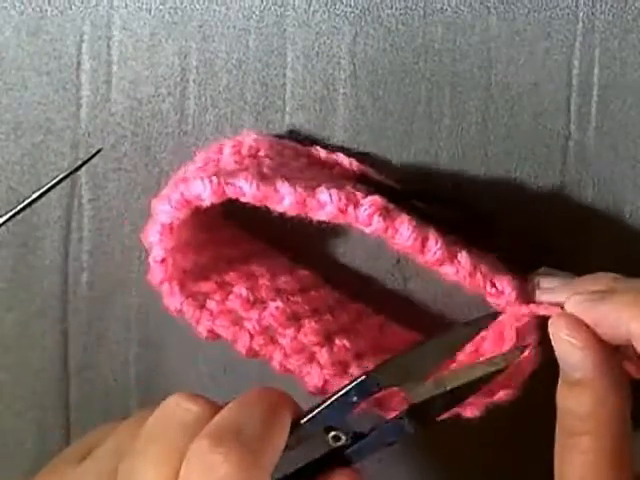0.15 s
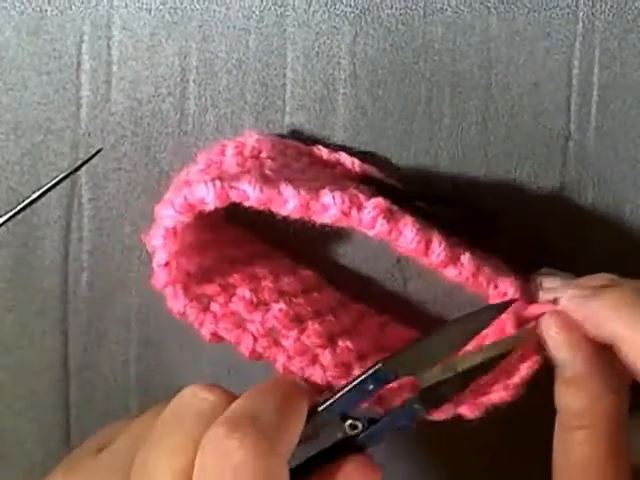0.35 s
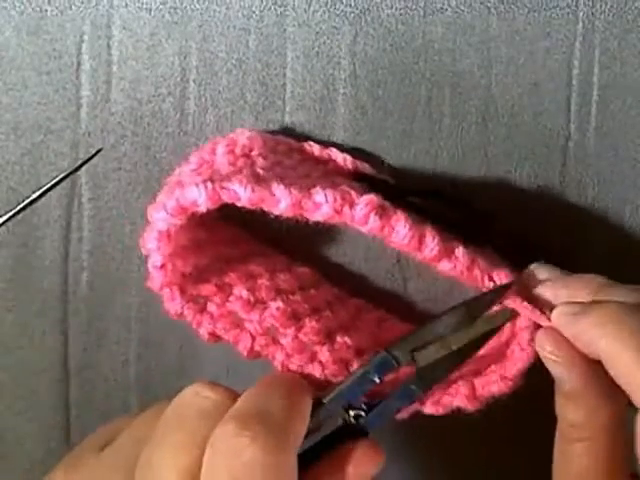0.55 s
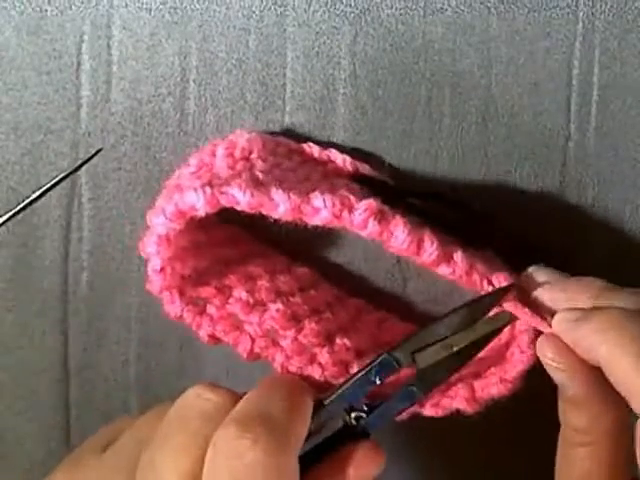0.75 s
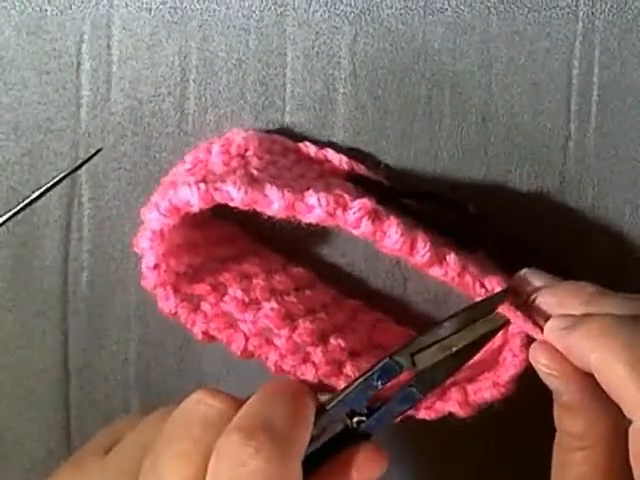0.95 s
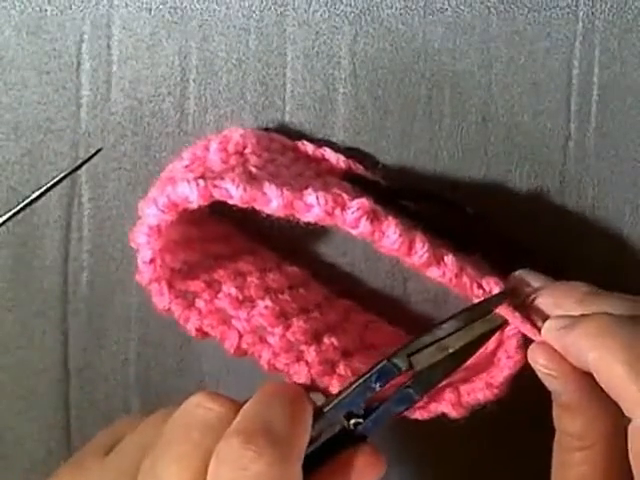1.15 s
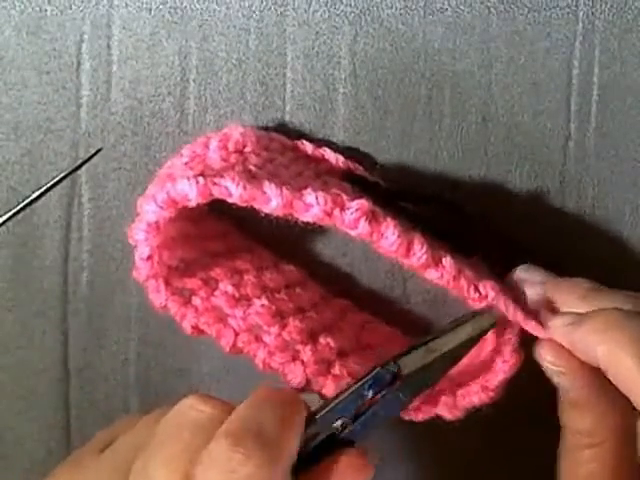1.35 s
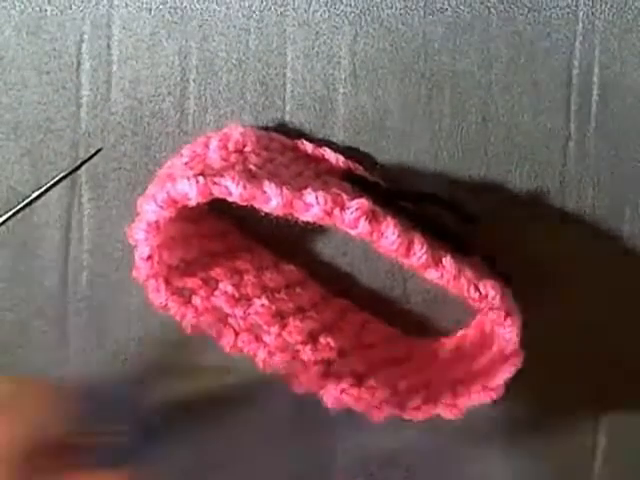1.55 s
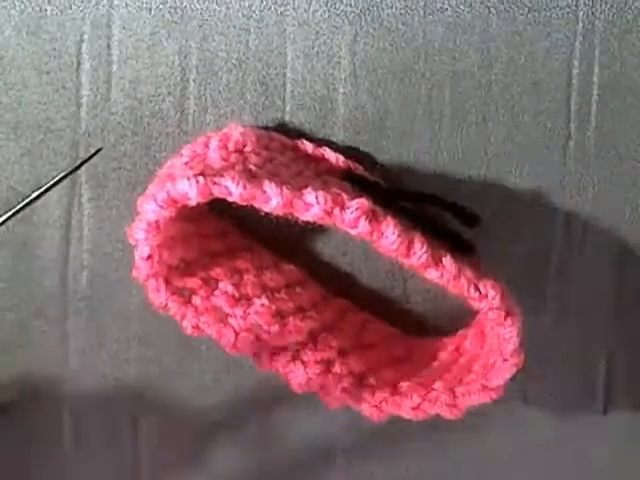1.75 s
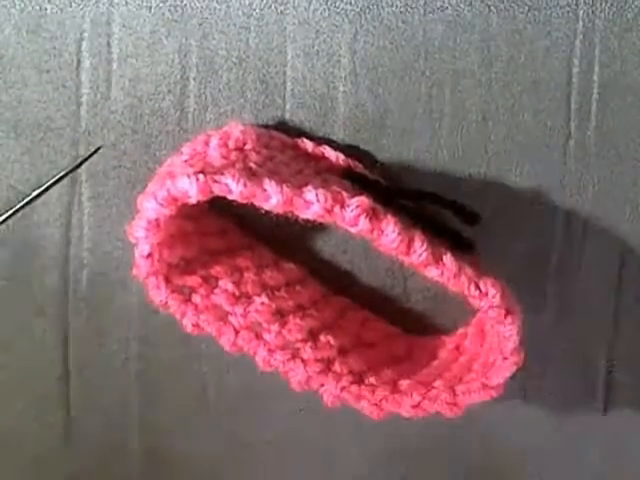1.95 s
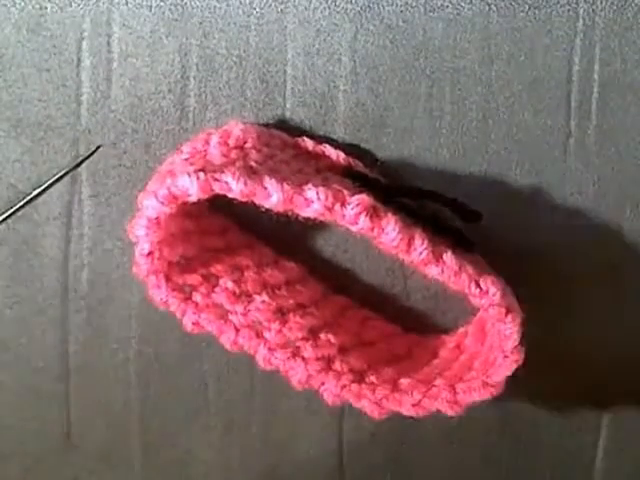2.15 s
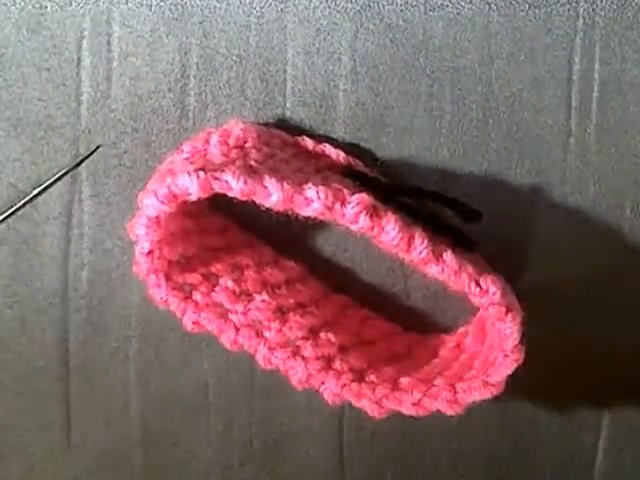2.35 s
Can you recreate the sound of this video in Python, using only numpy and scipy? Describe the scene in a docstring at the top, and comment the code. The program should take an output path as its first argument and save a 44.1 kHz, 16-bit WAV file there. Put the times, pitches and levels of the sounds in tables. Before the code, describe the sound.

Small scissors snip once through yarn, followed by a fainter click, in a quiet room.

```python
"""A quiet room with a bed of air and mains hum; hands bump softly on a cloth-covered table throughout. At about
1.3 s small steel scissors slide closed on a strand of yarn, close to the microphone. At 1.4 s the edges crunch
through the fibres, the blades clap shut and ring, and the handles knock, with a short room tail. At 1.6 s the
blades scrape briefly and knock as they part, and from about 1.9 s a faint thin hiss comes up."""
import sys
import numpy as np
from scipy import signal
from scipy.fft import rfft, irfft
from scipy.io import wavfile
from scipy.ndimage import uniform_filter1d, map_coordinates

SR = 44100
rng = np.random.default_rng(int(sys.argv[2]) if len(sys.argv) > 2 else 0)


def store_wav(level_fs):
    """Save 16-bit WAV to argv[1]."""
    pcm = np.round(np.clip(np.atleast_2d(level_fs), -1, 1) * 32767)
    wavfile.write(sys.argv[1], SR, pcm.T.astype(np.int16))


N = 105751
TIME = np.arange(N) / SR

# Colour of the room's air. Each row: frequency in Hz, relative level in dB.
AIR_COLOUR = [(25, -16), (50, -17.5), (100, 4.5), (200, 1), (270, 5.5), (400, -0.5), (680, 2), (850, -2.5),
              (1200, 1.5), (1700, -4), (2600, -1.5), (3000, -10.5), (4000, -11), (5200, -9), (6500, -17.5),
              (8200, -24), (12500, -28), (15000, -40.5)]
# How centred the air is. Each row: frequency in Hz, left-right likeness from 0 to 1.
AIR_CENTRING = [(400, .9), (950, .95), (2400, .985), (5000, .998)]
# Mains hum. Each row: frequency in Hz, level in dB before panning.
MAINS_HUM = [(60, -88), (120, -75)]
# Pan of air and hum. Each row: frequency in Hz, left over right in dB.
ROOM_TONE_PAN = [(1000, 2.7), (2600, .2), (5000, 0)]
# Hands on the table, and at 1.595 s a knock of the blades as they part. Each row: start in seconds, level in
# dB, pitch in Hz.
HAND_BUMPS = [(.155, -64, 677), (.566, -56.5, 257), (.945, -66.5, 267), (1.175, -61.5, 250),
              (1.595, -62, 1130), (1.598, -60.5, 283), (1.988, -60, 265), (2.056, -57, 688),
              (2.08, -63, 380), (2.374, -58, 305)]
# Blades closing, then parting. Each row: peak time in seconds, level in dB, rise and fall in seconds.
SLIDE_STROKES = [(1.34, -69.5, 0.052, .04), (1.3705, -56, .0015, .005), (1.3905, -45, .004, .004),
                 (1.5978, -34.5, .004, 0.005), (1.6015, -32.5, 0.0021, .003)]
# Colour of steel on steel. Each row: frequency in Hz, relative level in dB.
SLIDE_COLOUR = [(300, -29), (800, -45.5), (1200, -25.5), (1700, -36), (2800, -23), (4100, -24), (4850, -2),
                (5600, 3), (6500, -0.5), (7700, -3.5), (8500, -14), (9500, -11), (10200, -20),
                (11000, -8.5), (12300, -20.5), (13200, -18), (14300, -32), (15200, -50)]
# Edges biting the yarn. Each row: peak time in seconds, level in dB, rise and fall in seconds.
YARN_BITES = [(1.4015, -29, .0016, .003), (1.4045, -16, .002, .002)]
# Colour of the parting fibres. Each row: frequency in Hz, relative level in dB.
FIBRE_COLOUR = [(300, -18), (1200, -20), (1800, -23.5), (3000, -17), (4000, -15), (4600, -12.5),
                (5900, -7.5), (8000, -9.5), (12000, -15.5), (13300, -23), (14800, -23.5)]
# Blades chattering shut. Each row: time in seconds, relative level in dB.
BLADE_CONTACTS = [(1.4046, 2), (1.4062, 1), (1.4075, -9.5)]
# Colour of each contact's crack. Each row: frequency in Hz, relative level in dB.
CRACK_COLOUR = [(200, -26.5), (800, -5.5), (1200, -1), (1700, -14.5), (2400, -3.5), (3000, 6),
                (3700, -10.5), (6000, -6), (9500, 4), (10400, -5), (11800, -10), (13100, -10), (14300, -3),
                (15600, -15.5)]
# Ring of the blades. Each row: frequency in Hz, relative level in dB, T60 in seconds.
BLADE_MODES = [(2500, -28, .014), (2897, -31, .04), (3004, -30, .04), (3228, -30, .04), (4297, -37, .05),
               (5465, -19, .022), (5620, -14.5, .021), (6045, -16, .024), (6277, -26, .025),
               (7720, -24, .012), (8360, -14, .018), (8595, -11.5, .015), (9170, -27, .03),
               (9490, -15, .014)]
# Dull knock of handles and fingers. Each row: frequency in Hz, relative level in dB, T60 in seconds.
HANDLE_MODES = [(290, -35, 0.012), (410, -19.5, 0.012), (600, -21.5, .011), (904.5, -40, 0.013),
                (1132, -25.5, 0.021)]
# Colour of the room's tail. Each row: frequency in Hz, gain in dB.
REVERB_COLOUR = [(200, -18), (700, -17.5), (1400, -19), (2800, -8.5), (3500, -8.5), (4400, -3.5),
                 (5800, -8), (8800, -10.5), (11000, -7), (12500, -10.5), (14500, -23)]
# The gate's crossovers, each in Hz.
CROSSOVERS_HZ = [4800, 7000, 10500]
# Fader moves of the hiss. Each row: time in seconds, level in dB.
HISS_FADER = [(1.8, -99.5), (1.93, -71), (2.03, -73), (2.062, -65.5), (2.11, -71), (2.19, -73),
              (2.24, -69.5), (2.39, -72)]
# Colour of the hiss before its glide. Each row: frequency in Hz, relative level in dB.
HISS_COLOUR = [(3500, -17.5), (4400, -9), (4700, -8), (4890, 8), (5120, -10.5), (6300, -17.5),
               (8800, -30.5), (10000, -24), (12500, -34), (15000, -51.5)]


def from_db(db):
    """Decibels to gain."""
    return 10 ** (np.asarray(db) / 20)


def per_bin(points):
    """A curve over log frequency, read at every spectral bin."""
    hz, value = np.transpose(points)
    return np.interp(np.log(np.fft.rfftfreq(N, 1 / SR) + 1), np.log(hz), value)


def pan(left_db):
    """Left and right gains for a level difference."""
    return from_db(np.array([[.5], [-.5]]) * left_db)


def white_spectrum(likeness):
    """Spectrum of stereo white noise, from wide (likeness 0) to mono (1)."""
    mid, side = rfft(rng.standard_normal((2, N)))
    return (np.sqrt(1 + likeness) * mid + np.sqrt(1 - likeness) * side * [[1], [-1]]) / np.sqrt(2)


def noise(colour, likeness):
    """Coloured stereo noise of rms 1."""
    x = irfft(white_spectrum(likeness) * from_db(per_bin(colour)), N)
    return x / x.std()


def struck_mode(start, db, hz, t60):
    """One impulse sets a damped sine ringing."""
    impulse = np.zeros(N)
    impulse[int(start * SR)] = from_db(db)
    r, w = from_db(-60 / (t60 * SR)), 2 * np.pi * hz / SR
    return signal.lfilter([0, np.sin(w)], [1, -2 * r * np.cos(w), r * r], impulse + 1e-18)


def attack(start, rise_s):
    """Envelope that eases from 0 up to 1."""
    return 1 - np.exp(-np.maximum(TIME - start, 0) / rise_s)


def swell(peak_s, db, rise_s, fall_s):
    """Envelope that grows to a peak and dies away."""
    return from_db(db) * np.exp(-np.maximum((peak_s - TIME) / rise_s, (TIME - peak_s) / fall_s))


def friction(strokes, colour, spread_db, likeness, slips_per_s=12000):
    """Dense tiny slips of uneven size, widened with noise and shaped by the strokes."""
    slips = (rng.random(N) < slips_per_s / SR) * rng.choice([-1, 1], N)
    sizes = from_db(spread_db * np.minimum(rng.exponential(1, N), 3))
    grain = irfft(rfft(slips * sizes) * from_db(per_bin(colour)), N)
    texture = np.sqrt(likeness) * grain / grain.std() + np.sqrt(1 - likeness) * noise(colour, 0)
    return texture * sum(swell(*stroke) for stroke in strokes)


def room_tone():
    """A steady bed of air and mains hum, its low end leaning left."""
    hum = sum(np.sqrt(2) * from_db(db) * np.sin(2 * np.pi * (hz * TIME + rng.random()))
              for hz, db in MAINS_HUM)
    air = from_db(-66) * noise(AIR_COLOUR, per_bin(AIR_CENTRING))
    return irfft(rfft(air + hum) * pan(per_bin(ROOM_TONE_PAN)), N)


def hand_bumps():
    """Hands meet the cloth-covered table, and the parting blades knock once: each a damped tone with a soft
    attack."""
    return sum(2 * struck_mode(start, db, hz, t60=.085) * attack(start, rise_s=.0035)
               for start, db, hz in HAND_BUMPS)


def blade_slide():
    """Steel rubs over steel: a bright scrape just right of centre."""
    return pan(left_db=-1) * friction(SLIDE_STROKES, SLIDE_COLOUR, spread_db=2, likeness=.86)


def yarn_crunch():
    """The edges part the fibres in one short, wide crunch."""
    return friction(YARN_BITES, FIBRE_COLOUR, spread_db=3, likeness=.5)


def blade_clap(ring_s=1.4055, ring_db=1.5, crack_db=-14.5, right_lag_s=9e-6):
    """Each contact gives a short crack; the blades' modes build up underneath and ring out."""
    modes = sum((-1) ** k * struck_mode(ring_s, ring_db + db, hz, t60)
                for k, (hz, db, t60) in enumerate(BLADE_MODES))
    left = modes * attack(ring_s, rise_s=.0004)
    right = irfft(rfft(left) * np.exp(-2j * np.pi * np.fft.rfftfreq(N, 1 / SR) * right_lag_s), N)
    chatter = sum(swell(s, db + crack_db, rise_s=.0001, fall_s=.0013) for s, db in BLADE_CONTACTS)
    return np.array([left, right]) + noise(CRACK_COLOUR, likeness=.4) * chatter


def handle_knock(start=1.4052, low_cut_hz=260, puff_width_s=.00037):
    """The handles stop against each other: a few damped modes and a low puff, both leaning right."""
    modes = sum(struck_mode(start, db, hz, t60) for hz, db, t60 in HANDLE_MODES)
    low_cut = signal.butter(2, low_cut_hz, "high", fs=SR, output="sos")
    body = signal.sosfilt(low_cut, pan(left_db=-5) * modes)
    puff = from_db(-18.5) * np.exp(-((TIME - start) / puff_width_s) ** 2)
    return body + puff * np.array([[-.5], [1]])  # opposite polarity on the two sides


def room_reverb(send, t60=.24, predelay_s=.004):
    """The short diffuse tail of a small room, almost mono."""
    decay = from_db(-60 * TIME / t60) * (TIME > predelay_s)
    wash = irfft(white_spectrum(likeness=.99) * from_db(per_bin(REVERB_COLOUR)), N)
    response = wash * decay / np.sqrt(np.sum(decay ** 2))
    return signal.fftconvolve(send.mean(axis=0)[None], response, axes=1)[:, :N]


def soft_gate(x, threshold_db=-56.5, window_s=.025):
    """A multiband gate: a band loses one more dB for each dB it falls below the threshold."""
    lows = [signal.sosfiltfilt(signal.butter(4, hz, fs=SR, output="sos"), x + 1e-18)
            for hz in CROSSOVERS_HZ]
    bands = np.diff([np.zeros_like(x), *lows, x], axis=0)
    power = uniform_filter1d(np.mean(bands ** 2, axis=1, keepdims=True), int(window_s * SR))
    level_db = 10 * np.log10(np.maximum(power, 1e-14))
    return np.sum(bands * from_db(np.minimum(level_db - threshold_db, 0)), axis=0)


def thin_hiss(glide_per_s=.055, unshifted_at_s=2.1):
    """A faint narrow hiss that wavers in level and creeps up in pitch."""
    hiss = noise(HISS_COLOUR, likeness=.98)[0]
    speed = np.exp(glide_per_s * (TIME - unshifted_at_s))
    gliding = map_coordinates(hiss, [np.cumsum(speed)], order=3, mode="wrap")
    return from_db(np.interp(TIME, *np.transpose(HISS_FADER))) * gliding


def scene():
    """The mix: only the cut and the slide feed the gated reverb."""
    cut = yarn_crunch() + blade_clap()
    slide = blade_slide()
    tail = soft_gate(room_reverb(cut + from_db(-2.5) * slide))
    return cut + handle_knock() + slide + tail + hand_bumps() + thin_hiss() + room_tone()


def record(dry):
    """A soft clip rounds the highest peaks, then a steep high cut takes off the very top."""
    ceiling, high_cut_hz = .72, 15500
    rounded = dry / (1 + (dry / ceiling) ** 4) ** .25
    return signal.sosfilt(signal.ellip(10, .2, 80, high_cut_hz, fs=SR, output="sos"), rounded)


dry = scene()
out = record(dry)
store_wav(out)
```